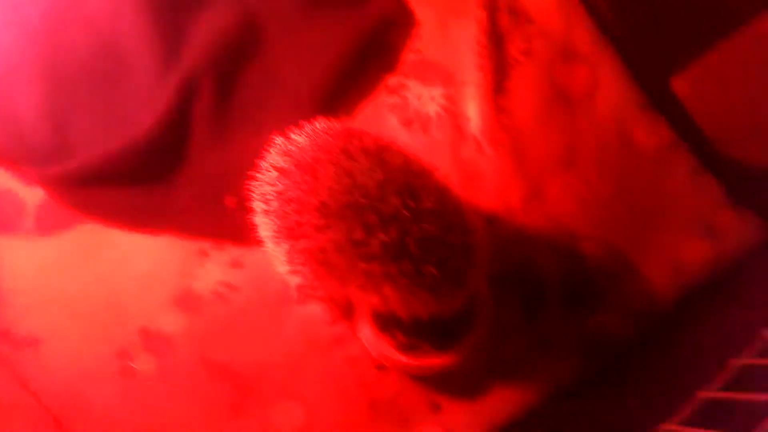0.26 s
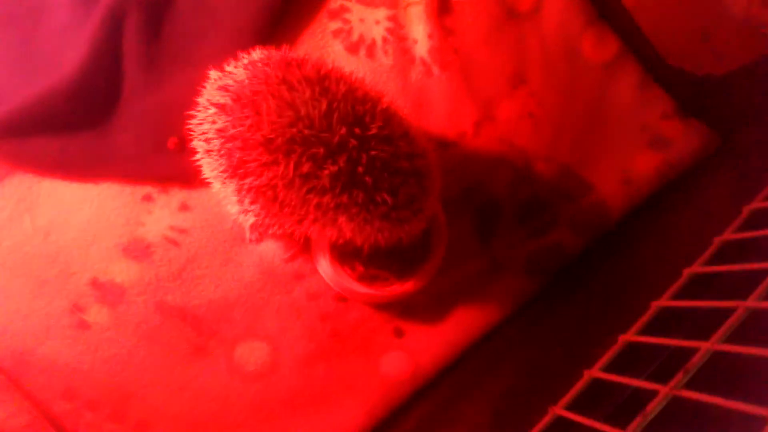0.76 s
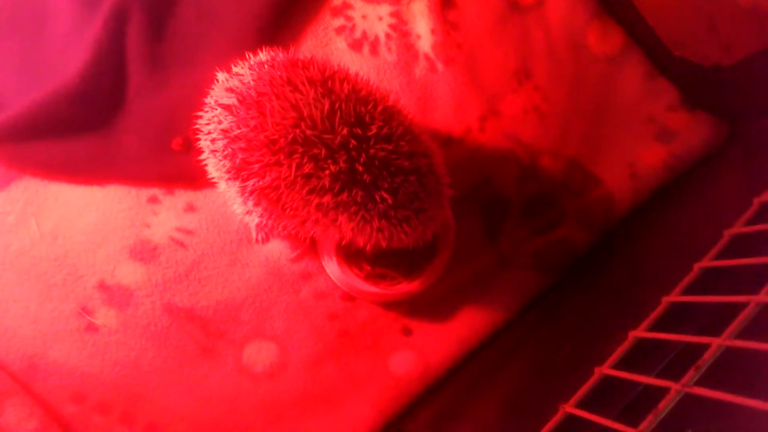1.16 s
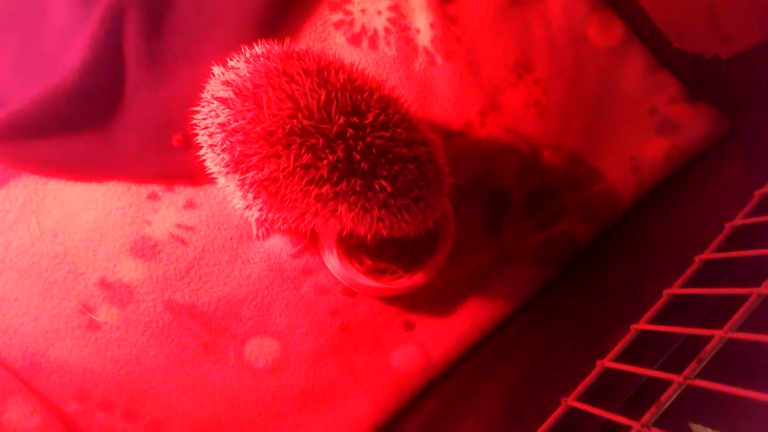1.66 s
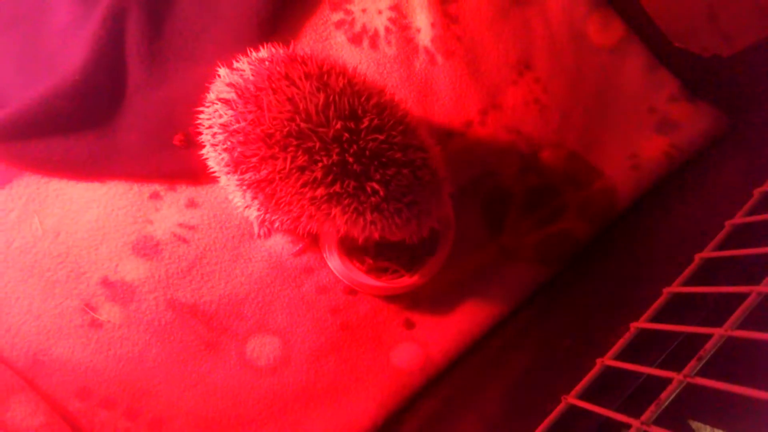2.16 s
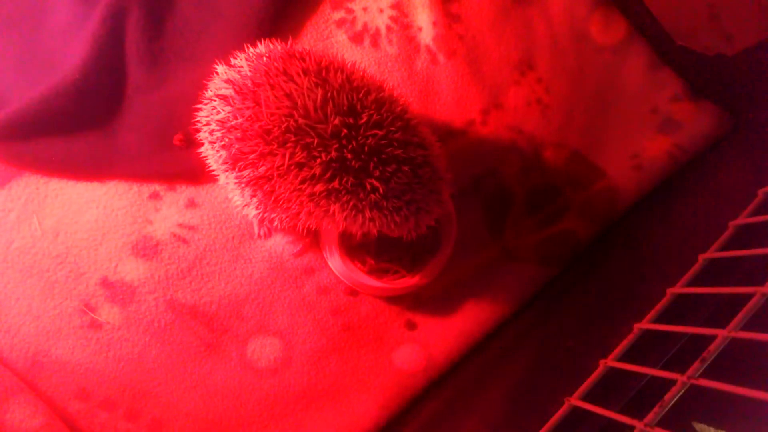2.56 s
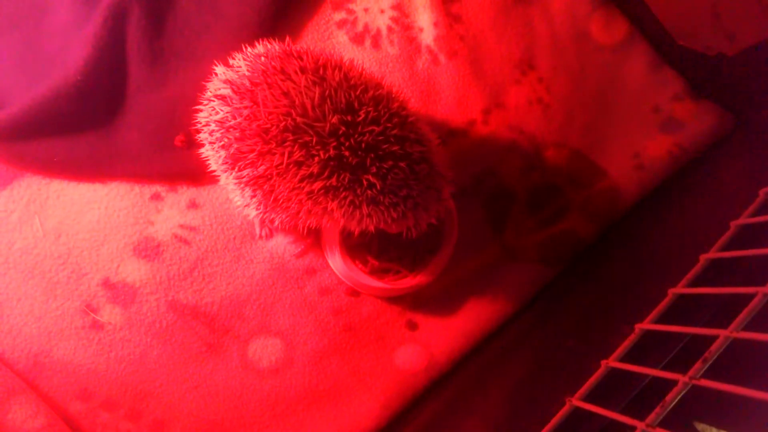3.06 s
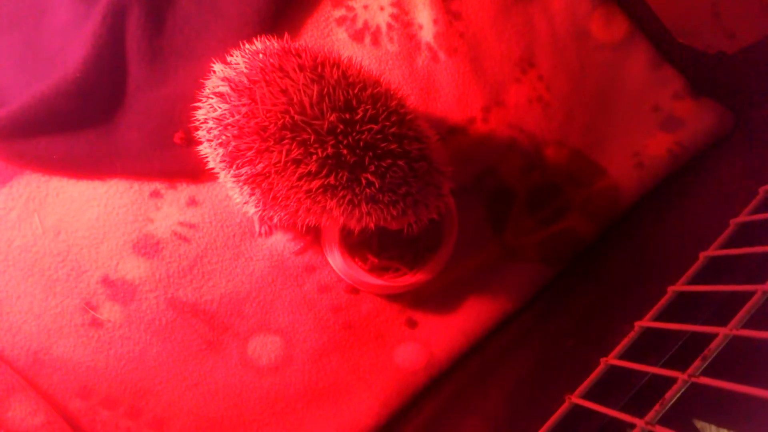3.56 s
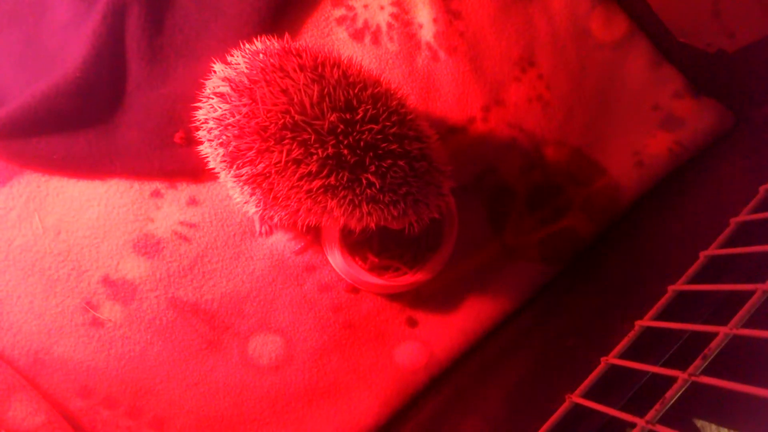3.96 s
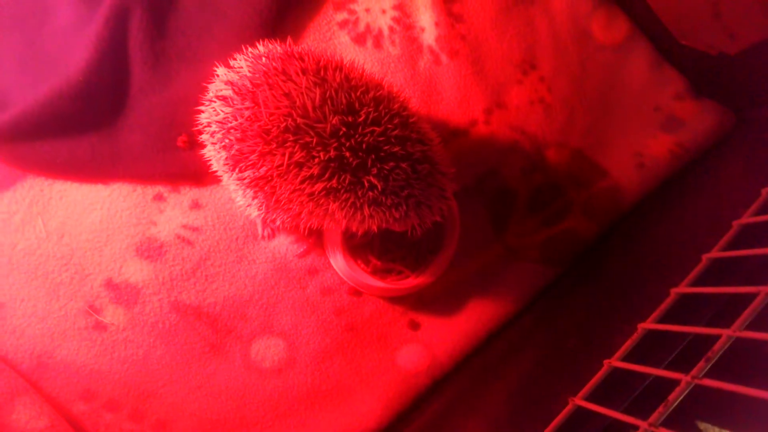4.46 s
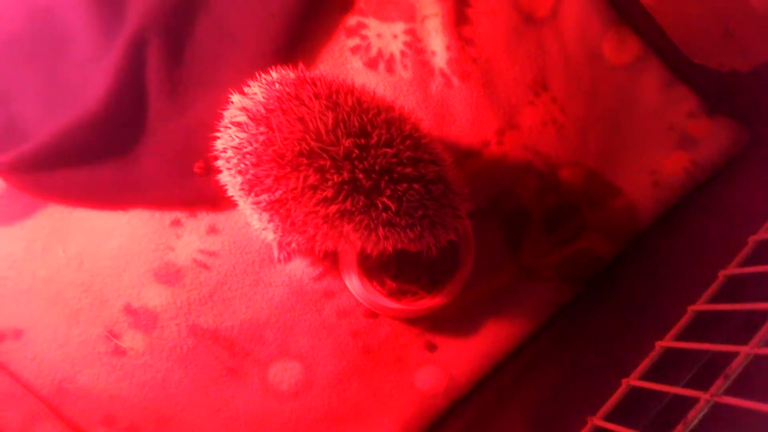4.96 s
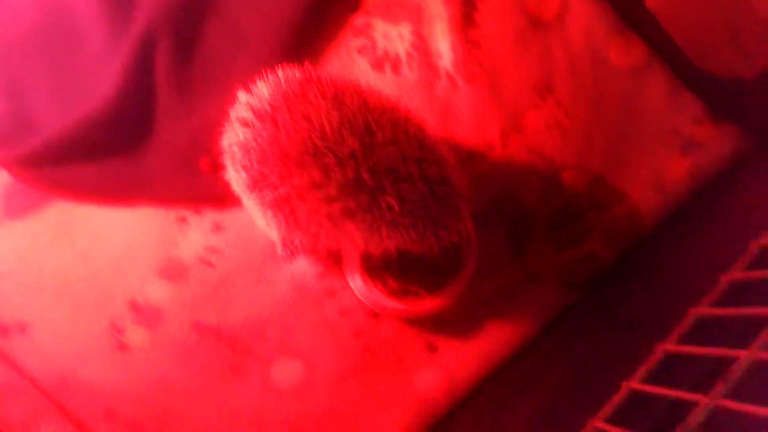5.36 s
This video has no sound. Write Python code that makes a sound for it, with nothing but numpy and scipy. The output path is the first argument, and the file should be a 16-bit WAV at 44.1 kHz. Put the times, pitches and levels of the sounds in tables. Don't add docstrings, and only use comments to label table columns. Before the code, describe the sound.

Handling scrapes and a heavy bump, then small dry crackling bites of shell close by, ending in more rubbing and knocks over hiss.

```python
import sys
import numpy as np
from scipy import signal
from scipy.io import wavfile

SR = 44100
rng = np.random.default_rng(int(sys.argv[2]) if len(sys.argv) > 2 else 0)


def to_linear_factor(level_db):
    exponent = np.asarray(level_db, float) / 20
    return 10 ** exponent


def master(y):
    cut = np.clip(np.atleast_2d(y).T, -1, 1)
    pcm = np.round(cut * 32767)
    wavfile.write(sys.argv[1], SR, pcm.astype(np.int16))


N = 246959

# (strongest time [s], rise [s], fade [s], fine level [dB], dull level [dB])
SETTLING_STROKES = [(0.0, .1, 0.076, -38, -37), (0.125, 0.11, 0.086, -35, -34.5),
                    (0.192, 0.035, 0.019, -45, -38), (0.248, 0.022, 0.063, -49.5, -47.5),
                    (0.38, .045, 0.27, -53, -42.5), (0.6, 0.29, 0.15, -48.5, -42.5),
                    (0.87, 0.3, 0.05, -53.5, -46.5), (0.95, 0.081, 0.12, -43, -42.5),
                    (1.065, 0.12, 0.18, -40, -41.5), (1.17, 0.053, 0.069, -42, -42),
                    (1.628, 0.025, 0.088, -85, -54)]
# (strongest time [s], rise [s], fade [s], fine level [dB], dull level [dB])
DRAWING_BACK_STROKES = [
    (3.05, 0.22, 0.37, -63, -56.5),
    (3.99, 0.051, 0.037, -80, -55.5),
    (4.846, 0.011, 0.067, -57, -34),
    (4.89, 0.013, .05, -41.5, -42),
    (5.031, 0.058, 0.054, -45.5, -42.5),
    (5.337, 0.012, 0.061, -50.5, -43),
    (5.425, 0.066, 0.089, -42, -43.5),
    (5.5, 0.025, 0.22, -51.5, -54.5),
]
# (frequency [Hz], width [Hz], level [dB])
RUB_DULL = [(330, 330, -5.5), (546, 686, -2), (1050, 510, -6.5)]
# (frequency [Hz], width [Hz], level [dB])
RUB_BODY = [(1890, 1230, -0.5), (3220, 670, 1.5), (4270, 1160, -6.5)]
# (frequency [Hz], width [Hz], level [dB])
RUB_BRIGHT = [(5400, 730, -3), (7290, 210, -1.5), (8000, 2500, 1), (10940, 1400, 5.5), (13070, 2700, 3),
              (13970, 520, 3.5), (14800, 2700, -12)]
# (frequency [Hz], width [Hz], level [dB])
LEFT_SHADOW = [(9300, 5400, -9)]
# (time [s], level [dB])
RUMBLE_LEVEL = [(0.0, -51), (0.254, -38.5), (0.346, -41.5), (0.801, -44.5), (0.898, -37), (1.334, -44),
                (1.7, -46.5), (1.9, -51), (2.441, -48.5), (2.75, -49), (3.583, -51), (3.95, -48.5),
                (4.319, -46.5), (4.632, -43.5), (4.87, -47.5), (5.265, -47.5), (5.386, -35.5),
                (5.599, -41.5)]
# (frequency [Hz], width [Hz], level [dB])
RUMBLE_BODY = [(45.7, 76, -3.5), (136.4, 78, -3), (180.5, 41.3, -5), (331, 97, -9), (485, 214, -12.5)]
# (frequency [Hz], width [Hz], level [dB])
HISS_COLOUR = [(800, 2280, -64.5), (3230, 190, -77), (2080, 1700, -87.5), (5170, 12700, -54),
               (8830, 6900, -53.5), (14800, 4800, -64.5)]
# (time [s], peak [dB], ring [Hz], direction [+-1])
GRIP_KNOCKS = [(0.0856, -25.5, 600, -1), (0.1036, -29.5, 1050, 1), (0.1963, -25, 740, 1),
               (0.2427, -7, 292, 1), (0.2466, -10.5, 317, 1), (0.3582, -34.5, 468, -1),
               (0.8271, -23.5, 400, 1), (0.9428, -20.5, 268, 1), (0.951, -27, 650, 1),
               (1.047, -26, 290, -1), (1.2318, -29.5, 373, 1), (1.2954, -31.5, 397, 1),
               (1.4608, -36, 306, 1), (1.529, -32, 386, 1), (1.617, -39, 555, 1), (2, -40, 400, -1),
               (2.138, -43, 320, 1), (3.647, -39.5, 725, 1), (3.997, -42, 690, 1), (4.1474, -25, 330, 1),
               (4.5092, -38, 330, 1), (4.8386, -27, 640, -1), (4.8449, -32, 770, 1), (4.8494, -32, 530, -1),
               (4.862, -23, 390, 1), (4.8834, -19.5, 594, -1), (5.322, -20, 338, -1),
               (5.3378, -19.5, 306, -1), (5.4048, -16.5, 416, -1), (5.503, -31, 633, -1)]
# (time [s], peak [dB], ring [Hz], direction [+-1])
PALM_JOLTS = [(0.2017, -22, 92, -1), (0.2545, -18, 59, 1), (0.8388, -25, 81, 1), (0.9643, -23.5, 149, -1),
              (1.2452, -27.5, 118, 1), (1.3405, -24.5, 92, 1), (1.354, -28.5, 143, 1),
              (1.539, -29, 106, -1), (2.015, -35, 104, -1), (3.6465, -31, 167, 1), (3.7463, -30, 129, 1),
              (4.079, -35, 134, -1), (4.1553, -34, 130, 1), (4.709, -30, 93, 1), (4.812, -26, 150, 1),
              (5.0163, -27, 146, -1), (5.039, -27.5, 103, 1), (5.184, -29.5, 95, 1), (5.4823, -24, 80, 1)]
# (time [s], bright level [dB], body level [dB])
SEAM_TICKS = [(0.1961, -18, -36.5), (0.2418, -56, -16.5), (0.2457, -47, -24), (0.95, -41, -29),
              (0.9882, -27, -37), (4.8399, -59, -32.5), (4.844, -43, -44), (4.8844, -22.5, -20.5),
              (5.3333, -37.5, -38), (5.4059, -29, -20), (5.5025, -51, -54)]
# (frequency [Hz], width [Hz], level [dB])
SEAM_BODY = [(975, 1200, -1.5), (2170, 670, 1.5), (3840, 2600, -11)]
# (start [s], end [s], body level [dB], bright level [dB])
SHELL_BITES = [(1.996, 2.031, -58, -47), (2.127, 2.141, -48.5, -49.5), (2.252, 2.348, -43, -45.5),
               (2.329, 2.376, -48, -51.5), (2.436, 2.446, -51, -59.5), (2.8, 2.846, -48.5, -55),
               (2.846, 2.907, -41.5, -43.5), (2.912, 3.013, -49, -48), (3.029, 3.079, -49, -60),
               (3.159, 3.223, -41.5, -44.5), (3.216, 3.227, -44, -40), (3.352, 3.415, -49.5, -47),
               (3.57, 3.65, -77, -55), (3.666, 3.76, -61, -58), (3.765, 3.79, -45, -45),
               (3.786, 3.808, -37.5, -35), (4.473, 4.541, -45, -50.5), (4.547, 4.6, -55, -61),
               (4.597, 4.644, -47, -46.5)]
# (time [s], bright level [dB], body level [dB])
SHELL_CRACKS = [(2.0088, -29, -51), (2.1312, -33, -55), (2.2635, -47, -45), (2.289, -24.5, -30.5),
                (2.2996, -22, -39), (2.318, -24, -27.5), (2.36, -32.5, -35), (2.8307, -37, -34.5),
                (2.8635, -27, -33), (2.868, -28.5, -31.5), (2.9529, -26.5, -38), (3.0153, -26.5, -33.5),
                (3.0418, -25.5, -32), (3.0508, -32, -27.5), (3.177, -23, -33), (3.1916, -16, -25),
                (3.1984, -21, -23.5), (3.2175, -27, -34), (3.223, -37, -36), (3.3636, -27.5, -64),
                (3.3761, -26, -54), (3.5706, -32.5, -68), (3.769, -25, -53), (3.7754, -26, -51),
                (3.797, -11.5, -59), (4.495, -34, -37), (4.508, -34, -35), (4.5177, -31, -33),
                (4.5597, -33, -39.5), (4.623, -36, -44)]
# (frequency [Hz], width [Hz], level [dB])
CRUSH_BODY = [(2030, 660, 1.5), (2510, 440, -1.5), (3330, 930, -3), (4600, 850, -4)]
# (frequency [Hz], width [Hz], level [dB])
CRACK_BODY = [(2290, 620, 1), (2770, 750, -2.5), (4900, 710, -9.5)]
# (frequency [Hz], width [Hz], level [dB])
SHELL_BRIGHT = [(5540, 1500, -11.5), (7790, 1000, -2.5), (8970, 2100, -2), (10650, 930, 1.5),
                (12300, 1300, 0), (13450, 950, -1.5), (14400, 1000, -5.5)]

AIR_LAG, CASING_LAG = 17, 22
AIR_LEFT_DB, CASING_LEFT_DB, HISS_LEFT_DB = -0.8, -3.2, -0.2
CHEW_LEFT_DB = -2.4
OWN_HISS_DB, OWN_RUMBLE_DB = 2, -6
SCATTER_DB, UNLIKE_HZ = -13, 6460
CHEW_SCATTER_DB, CHEW_SCATTER_HZ = -3, 1230
BRIGHT_IN_DB, BRIGHT_OUT_DB = 4, -1.5
RISE_SHAPE, FALL_SHAPE = 0.87, 1.08
TREMOR_DB = 1.6
SMALL_CRACKS = 2
SMALL_BRIGHT_DB, SMALL_BODY_DB, SMALL_SPREAD_DB = 13, 1.5, 7


def rms_one(x):
    return x / np.sqrt(np.mean(x ** 2) + 1e-20)


def resonate(x, peaks):
    out = 0
    for k, (hz, width, db) in enumerate(peaks):
        r = np.exp(-np.pi * width / SR)
        b = np.sqrt((1 - r * r) / 2) * np.array([1, 0, -1])
        a = [1, -2 * r * np.cos(2 * np.pi * hz / SR), r * r]
        out = out + (-1) ** k * to_linear_factor(db) * signal.lfilter(b, a, x)
    return out


def drift(rate_hz):
    r = np.exp(-2 * np.pi * rate_hz / SR)
    noise = rng.standard_normal(N + SR)
    return rms_one(signal.lfilter([1], [1, -2 * r, r * r], noise)[SR:])


def grains(per_s, spread_db):
    sizes = to_linear_factor(spread_db * np.minimum(rng.exponential(1, N), 4))
    signs = rng.choice([-1, 1], N)
    return rms_one(sizes * signs * (rng.random(N) < per_s / SR))


def rumble():
    s, db = np.transpose(RUMBLE_LEVEL)
    level_db = np.interp(np.arange(N) / SR, s, db, left=-120, right=-120)
    low = resonate(rng.standard_normal((2, N + SR)), RUMBLE_BODY)[:, SR:]
    return to_linear_factor(np.maximum(level_db - 1, -70) + TREMOR_DB * drift(5.7)) * rms_one(low)


def strokes(rows):
    t, power = np.arange(N) / SR, np.zeros((2, N))
    for top, rise, fade, fine_db, dull_db in rows:
        ramp = np.interp(t, [top - rise, top, top + fade], [0, 1, 0])
        swell = ramp ** np.where(t < top, RISE_SHAPE, FALL_SHAPE)
        power += np.outer(to_linear_factor(np.array([fine_db, dull_db])), swell) ** 2
    return np.sqrt(power)


def rubbing():
    first, first_dull = strokes(SETTLING_STROKES)
    last, last_dull = strokes(DRAWING_BACK_STROKES)
    slips = grains(per_s=14000, spread_db=-1.0) * to_linear_factor(1.4 * drift(40))
    lumps = grains(per_s=900, spread_db=-0.5) * to_linear_factor(1.6 * drift(27))
    muffle = signal.butter(3, 1700, fs=SR, output="sos")
    dull = (first_dull + last_dull) * rms_one(signal.sosfilt(muffle, resonate(lumps, RUB_DULL)))
    body = (first + last) * rms_one(resonate(slips, RUB_BODY) + 0.28 * slips)
    bright_gain = to_linear_factor(BRIGHT_IN_DB) * first + to_linear_factor(BRIGHT_OUT_DB) * last
    return dull, body + bright_gain * rms_one(resonate(slips, RUB_BRIGHT))


def hiss():
    return resonate(rng.standard_normal((3, N)), HISS_COLOUR)


def knocks():
    out, after = np.zeros(N + 4000), np.arange(4000) / SR
    swing = 1.88 * np.sin(2 * np.pi * 58 * after) * to_linear_factor(-60 * after / 0.012)
    for s, peak_db, hz, direction in GRIP_KNOCKS + PALM_JOLTS:
        turns = hz * (after + 0.00037 * (1 - np.exp(-after / 0.0025)))
        ring = np.sin(2 * np.pi * turns) * to_linear_factor(-60 * after * hz / 5.47)
        at = round(s * SR)
        out[at:at + 4000] += np.sign(direction) * to_linear_factor(peak_db + 4.5) * (ring - swing)
    return out[:N]


def snaps(breaks, body_colour):
    out = np.zeros((2, N))
    dying = to_linear_factor(-60 * np.arange(300) / SR / [[0.005], [0.011]])
    for s, bright_db, body_db in breaks:
        splinter = rng.standard_normal(300)
        splinter[0] = 2.5 * np.sign(splinter[0])
        at = round((s - 0.0004) * SR)
        out[:, at:at + 300] += to_linear_factor(np.array([[body_db + 3.5], [bright_db - 5.5]])) * dying * splinter
    return resonate(out[0], body_colour) + resonate(out[1], SHELL_BRIGHT)


def seam_ticks():
    return snaps(SEAM_TICKS, SEAM_BODY)


def crushing():
    t, bites = np.arange(N) / SR, np.zeros((2, N))
    crush = rms_one(grains(per_s=6000, spread_db=3.5) * to_linear_factor(3.5 * drift(200)))
    for start, end, body_db, bright_db in SHELL_BITES:
        place = np.clip((t - start) / (end - start), 0, 1)
        swell = np.sin(np.pi * place ** 0.95) ** 0.4
        bites += np.outer(to_linear_factor(np.array([body_db - 6, bright_db - 3])), swell * crush)
    return resonate(bites[0], CRUSH_BODY) + resonate(bites[1], SHELL_BRIGHT)


def small_cracks():
    breaks = []
    for start, end, body_db, bright_db in SHELL_BITES:
        for place, a, b in rng.random((SMALL_CRACKS, 3)) - [0, 0.5, 0.5]:
            breaks.append((start + place * (end - start),
                           bright_db + SMALL_BRIGHT_DB + 2 * SMALL_SPREAD_DB * a,
                           body_db + SMALL_BODY_DB + 2 * SMALL_SPREAD_DB * b))
    return breaks


def cracking(lesser):
    return snaps(SHELL_CRACKS + lesser, CRACK_BODY)


def scattered(x):
    echoes = rng.standard_normal(200) * to_linear_factor(-60 * np.arange(200) / SR / 0.008)
    echoes /= np.linalg.norm(echoes)
    return [np.convolve(row, echoes)[:N] for row in x]


def scene():
    low, own_low = rumble()
    dull, fine = rubbing()
    crush = crushing()
    lesser = small_cracks()
    crunch = seam_ticks() + crush + cracking(lesser)
    shared_hiss, own_left, own_right = hiss()
    casing = knocks() + low + dull
    air = crunch + fine

    air_echo, crunch_echo = scattered([air, crunch])
    unlike = np.array([to_linear_factor(SCATTER_DB) * air_echo + to_linear_factor(OWN_HISS_DB) * own_left,
                       to_linear_factor(OWN_HISS_DB) * own_right])
    unlike = signal.sosfilt(signal.butter(2, UNLIKE_HZ, "high", fs=SR, output="sos"), unlike)
    middle = signal.butter(2, [CHEW_SCATTER_HZ, UNLIKE_HZ], "band", fs=SR, output="sos")
    unlike[0] += to_linear_factor(CHEW_SCATTER_DB) * signal.sosfilt(middle, crunch_echo)

    (hz, width, db), = LEFT_SHADOW
    shaded = to_linear_factor(db) * signal.lfilter(*signal.iirpeak(hz, hz / width, fs=SR), fine)
    left_air = to_linear_factor(AIR_LEFT_DB) * (to_linear_factor(CHEW_LEFT_DB) * crunch + fine - shaded)
    left = np.roll(left_air + to_linear_factor(HISS_LEFT_DB) * shared_hiss, AIR_LAG)
    left += np.roll(to_linear_factor(CASING_LEFT_DB) * casing, CASING_LAG)
    return unlike + [to_linear_factor(OWN_RUMBLE_DB) * own_low - left, air + casing + shared_hiss]


def top_cut(x):
    return signal.sosfilt(signal.butter(12, 16140, fs=SR, output="sos"), x)


def record(dry):
    mix = signal.sosfilt(signal.cheby2(10, 60, 16600, fs=SR, output="sos"), dry)
    return top_cut(mix)


dry = scene()
out = record(dry)
master(out)
```